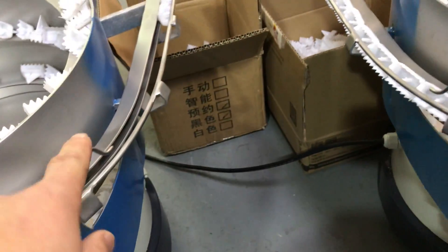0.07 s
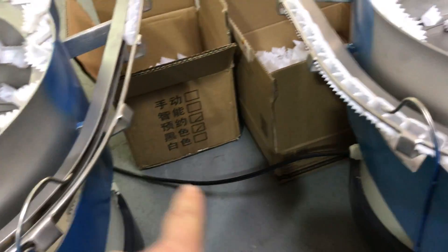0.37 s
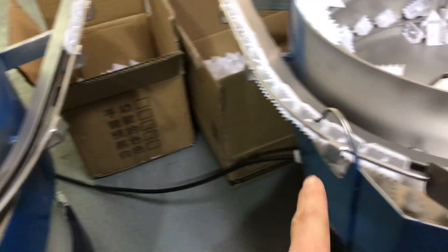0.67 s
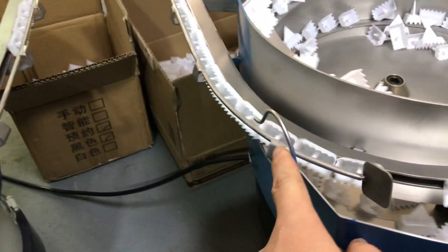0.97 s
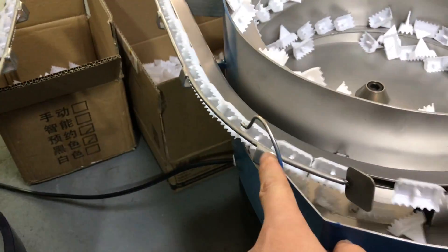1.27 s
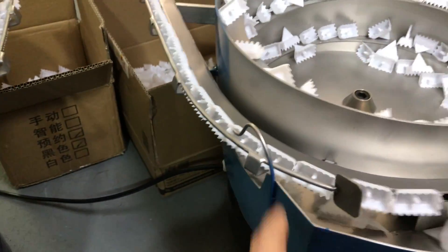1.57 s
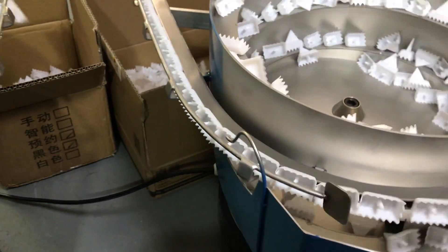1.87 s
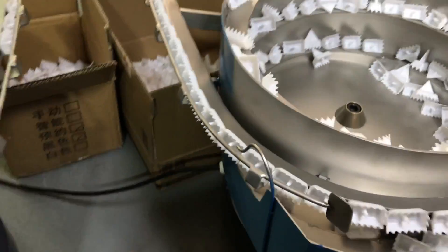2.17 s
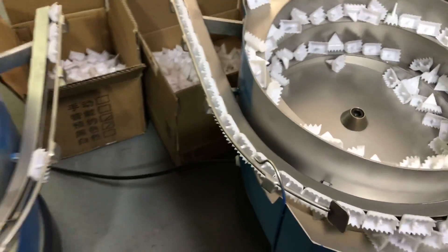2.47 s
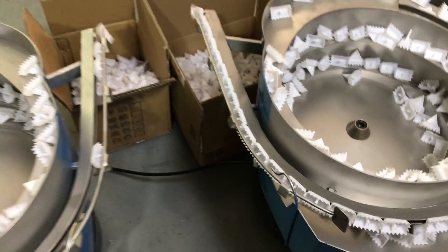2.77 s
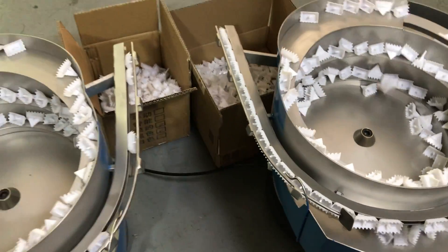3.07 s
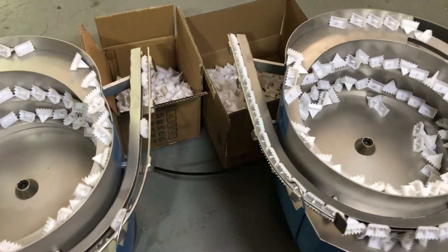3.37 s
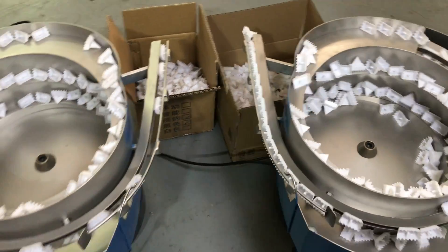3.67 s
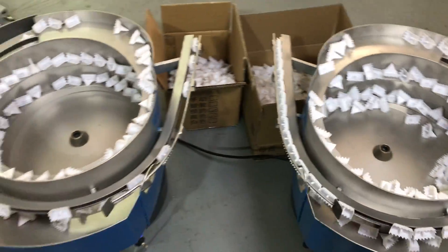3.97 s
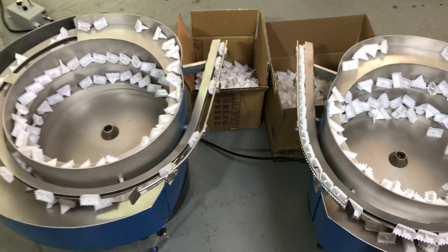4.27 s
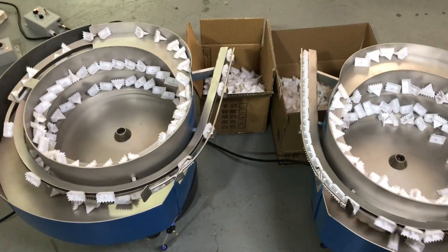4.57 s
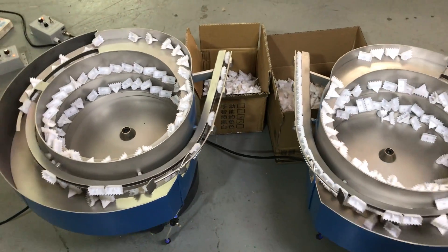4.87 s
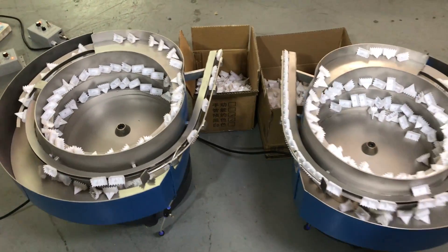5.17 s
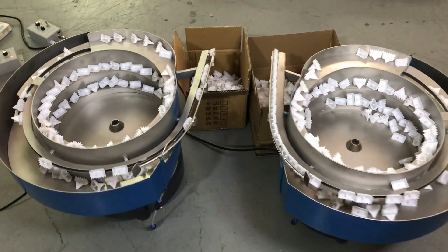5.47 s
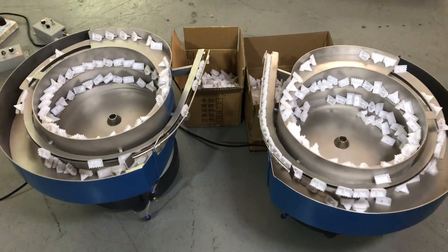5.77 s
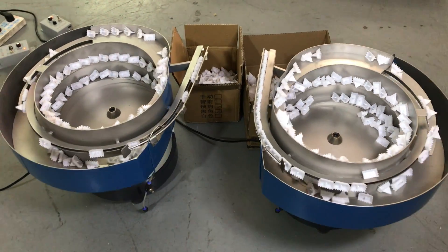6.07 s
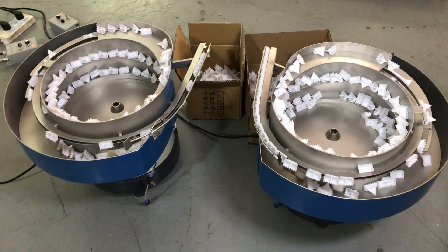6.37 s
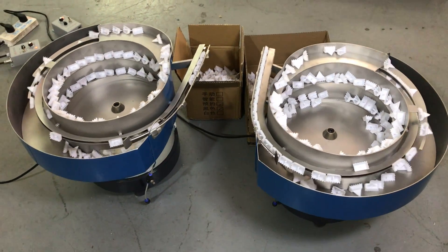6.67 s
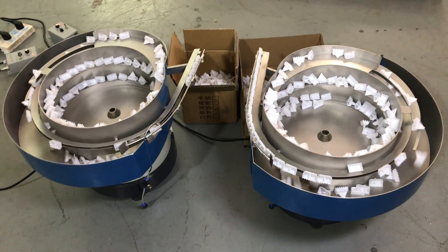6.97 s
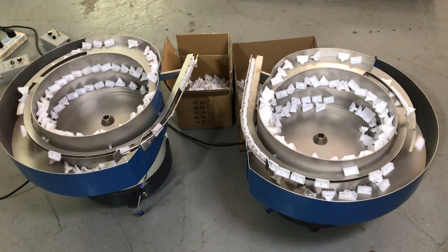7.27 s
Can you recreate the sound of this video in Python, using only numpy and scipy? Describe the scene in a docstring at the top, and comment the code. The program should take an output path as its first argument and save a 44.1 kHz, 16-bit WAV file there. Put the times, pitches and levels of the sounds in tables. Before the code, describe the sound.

Two vibratory bowl feeders are already running in a workshop and continue for the whole seven and a half seconds. Hundreds of small plastic parts hop in the steel bowls, merging into a dense, bright rattle with a flickering sizzle on top and a metallic ring inside it. Beneath it sit a steady low electric hum and a faint rumble from the shaking bases. Tiny dry plastic clicks are scattered through the clatter.

For the first two seconds or so the microphone is close to one bowl, and thin, high jingles of parts tapping steel come and go. Slightly lower ringing swells between about 1.5 and 3.3 seconds. From around 2.5 seconds the microphone draws back: the rattle gradually softens a little and the second bowl becomes more prominent. Another light ring rises at about 6.5 seconds while the hum and rattle carry on.

```python
"""Two vibratory bowl feeders in a workshop

Magnets hum at twice the mains frequency and toss hundreds of small plastic parts, which hop in
step with the drive, ring the steel bowls and shake the sprung bases. A hand-held mono microphone
passes close to the right bowl, then draws back and hears more of the left one."""
import sys
import numpy as np
from scipy import signal
from scipy.fft import rfft, irfft, next_fast_len
from scipy.io import wavfile
from scipy.ndimage import map_coordinates

SR = 44100
rng = np.random.default_rng(int(sys.argv[2]) if len(sys.argv) > 2 else 0)


def unload_wav(signal):
    """Save mono or channel-first audio to the path in sys.argv[1] as 16-bit WAV at rate SR, clipped to [-1, 1]."""
    wavfile.write(
        sys.argv[1],
        SR,
        np.round(np.clip(np.atleast_2d(signal).T, -1, 1) * 32767).astype(np.int16),
    )


N = 332073
DRIVE_HZ = 100.03

# Bowl and guide rail resonances. Each row: centre in Hz, width in Hz, dB over the broad colour.
RIGHT_BOWL_MODES = [(878, 55, 14.6), (1014, 59, 14.7), (1121, 21, 15.6), (1203, 12, 15.8), (1212, 15, 1.5),
                    (1255, 12, 22.0), (1319, 23, 20.9), (1423, 51, 18.7), (1546, 13, 16.9),
                    (1653, 50, 16.8), (1730, 15, 13.7), (1742, 14, 11.0), (1842, 14, 10.8), (1898, 23, 7.7),
                    (2238, 15, 15.0), (2312, 73, 11.9), (2523, 29, 13.9), (2658, 99, 10.0), (2829, 35, 7.4),
                    (2940, 29, 13.2), (3157, 94, 5.8), (3499, 50, 5.8), (3707, 34, 4.7), (3921, 48, 3.3),
                    (4125, 48, 5.8), (4250, 30, 4.8), (4720, 33, 3.9), (6478, 329, 3.0), (7834, 36, 7.5),
                    (8831, 50, 4.0)]
LEFT_BOWL_MODES = [(777, 37, 12.2), (858, 26, 18.8), (897, 11, 22.0), (972, 14, 17.8), (1053, 43, 20.5),
                   (1159, 12, 16.6), (1325, 26, 7.0), (1437, 40, 18.2), (1545, 13, 20.0), (1701, 82, 21.6),
                   (1838, 45, 19.5), (1935, 20, 15.6), (2008, 30, 22.0), (2174, 74, 21.9), (2323, 27, 17.9),
                   (2480, 95, 12.8), (2704, 47, 13.1), (2840, 106, 13.3), (2994, 18, 9.7),
                   (3178, 119, 12.4), (3458, 44, 10.8), (3699, 86, 11.5), (4000, 250, 8.4), (4388, 58, 6.4),
                   (4645, 23, 5.6), (5256, 89, 6.9), (5531, 70, 2.7), (5804, 85, 1.5), (6013, 52, 3.5),
                   (9932, 69, 7.4)]
GUIDE_RAIL_MODES = [(3745, 25, 3), (4370, 30, 1), (4543, 30, 1), (5250, 70, -1), (5660, 35, 1),
                    (6025, 40, 0), (6225, 40, 0), (6370, 60, 0), (6700, 70, -1), (7080, 80, 0),
                    (7515, 35, 1), (8090, 40, 2), (8195, 40, 1), (8830, 50, 0), (9400, 80, -1),
                    (10150, 70, 1)]
# Broad colour of each bowl. Each row: frequency in Hz, gain in dB.
RIGHT_BOWL_COLOUR = [(450, -62.5), (720, -21), (850, -12), (1100, -12.5), (1280, -28), (1600, -11.5),
                     (2000, -4.5), (2400, -5), (4300, 1.5), (6600, -6), (9300, -11.5), (10500, -21),
                     (13600, -17), (15700, -22.5)]
LEFT_BOWL_COLOUR = [(450, -60.5), (720, -20), (850, -23.5), (1100, -7.5), (1280, -9.5), (1600, -10.5),
                    (2000, -14.5), (2400, -6), (4300, 2), (6600, -1.5), (9300, -7), (10500, -15.5),
                    (13600, -11), (15700, -25)]
# Microphone path. Each row: time in seconds, distance in m, right bowl's share of the power.
MIC_PATH = [(0, .5, 0.4), (.6, 0.52, .89), (1.5, 0.54, 0.82), (2.3, 0.52, 0.6), (3, 0.64, 0.56),
            (3.8, 0.71, 0.34), (5, 0.85, 0.33), (6.4, 1.07, .21), (7.5, 0.91, .31)]

def rattle(ring_hz=1300, sizzle_hz=5000):
    """Hopping parts ring both bowls; balance and brightness follow the microphone."""
    right_hits = hops(count=110, wander=.12, scatter=.03, force_db=2, spell_db=2.5)
    right = resonate(right_hits, RIGHT_BOWL_COLOUR, [*RIGHT_BOWL_MODES, *GUIDE_RAIL_MODES])
    left_hits = hops(count=130, wander=.12, scatter=.03, force_db=2, spell_db=2.5)
    left = resonate(left_hits, LEFT_BOWL_COLOUR, [*LEFT_BOWL_MODES, *GUIDE_RAIL_MODES])
    distance_m, right_share = curves(MIC_PATH)
    both = workshop(np.sqrt(right_share) * unit(right) + np.sqrt(1 - right_share) * unit(left))
    ring = filtered(both, lambda hz: 1 / (1 + (hz / ring_hz) ** 16))
    sizzle = filtered(both, lambda hz: 1 - 1 / (1 + (hz / sizzle_hz) ** 16))
    clatter = unit(both - ring - sizzle)
    sizzle = unit(sizzle * amp(.45 * wobble(26)))  # jostling parts flicker the sharpest contacts
    ring_db = -11 + 2 * np.clip((right_share - .72) / .13, 0, 1)  # rises over the right bowl
    sizzle_db = -5.5 - .44 * np.log2(distance_m)
    return amp(clatter_db()) * (clatter + amp(ring_db) * unit(ring) + amp(sizzle_db) * sizzle)


def clatter_db(direct_1m_db=-26.5, room_radius_m=.78):
    """Midrange rattle level: direct sound falls with distance, the room's share stays."""
    distance_m, _ = curves(MIC_PATH)
    return direct_1m_db + 10 * np.log10(1 / distance_m ** 2 + 1 / room_radius_m ** 2)


def hops(count, wander, scatter, force_db, spell_db):
    """Parts land every 1, 2 or 3 strokes. Timing spreads are in strokes, force spreads in dB."""
    stroke = np.arange(int(N / SR * DRIVE_HZ) + 1)
    part = np.arange(count)[:, None]
    shape = (count, len(stroke))

    def drift():
        """Slow random change per part."""
        noise = rng.standard_normal(shape)
        return unit(signal.fftconvolve(noise, np.hanning(40)[None], "same", axes=1))

    lands = (stroke + rng.integers(0, 6, (count, 1))) % (1 + part % 3) == 0
    # each part's moment in the stroke drifts as it creeps up the track
    moment = part / count + wander * drift() + scatter * rng.standard_normal(shape)
    force = amp(spell_db * drift() + force_db * rng.standard_normal(shape))
    force *= rng.choice([-1, 1], (count, 1))
    at = np.round((stroke + moment) / DRIVE_HZ * SR).astype(int) % N
    return unit(np.bincount(at[lands], force[lands], N))


# Drive tone at the microphone. Each row: time in seconds, rms level in dB.
DRIVE_LEVELS = [(0.15, -27.5), (0.7, -27), (1.95, -27.5), (2.69, -26), (6.19, -28.5), (7.4, -29)]
# Overtones. Each row: multiple, dB re the mean drive level, waver in dB, dB per dB of drive rise.
DRIVE_OVERTONES = [(2, -18, 1.3, 1.8), (3, -19, 0.8, -0.2), (5, -48, .7, 1), (6, -42, .7, 1),
                   (9, -24, 4, 3)]

def magnets():
    """The magnets hum; overtones follow the drive level and waver with the load."""
    drive_db, = curves(DRIVE_LEVELS)
    rise_db = drive_db - drive_db.mean()
    overtones = sum(amp(db + follow * rise_db + waver_db * wobble(4.8)) * tone(multiple)
                    for multiple, db, waver_db, follow in DRIVE_OVERTONES)
    return amp(drive_db) * tone(1) + amp(drive_db.mean()) * overtones


# Chatter on one spot. Each row: start in seconds, length in seconds, pitch in Hz, crest in dB rms.
JINGLE_SPELLS = [(0, 0.16, 7860, -33), (0, 0.49, 5260, -32), (.58, .16, 7100, -33), (.8, 0.96, 7860, -34),
                 (.55, 1.1, 6370, -36), (1.1, .6, 6680, -34), (1.6, 1.1, 1666, -33),
                 (1.8, 1.5, 4130, -31.5), (2.6, 0.58, 2510, -31.5), (2.97, .06, 5243, -28),
                 (3, .8, 6600, -39), (3.2, .8, 6330, -40), (6.4, 1.4, 3240, -35)]

def jingles(width_hz=32, stray_count=10, stray_s=1.3):
    """A few parts tap one steel resonance per spell; faint stray spells ring the rails."""
    taps = hops(count=12, wander=.15, scatter=.032, force_db=5, spell_db=2)
    sound, level_db = np.zeros(N), clatter_db()
    strays = []
    for when, which in rng.random((stray_count, 2)):
        hz = GUIDE_RAIL_MODES[int(which * len(GUIDE_RAIL_MODES))][0]
        db = level_db[int(when * N)] - 19 + along(LEFT_BOWL_COLOUR, hz)
        strays.append((when * (N - SR // 4) / SR, stray_s, hz, db))
    for start_s, length_s, hz, db in [*JINGLE_SPELLS, *strays]:
        at = np.arange(int(start_s * SR), min(int((start_s + length_s) * SR), N))
        swell = np.abs(np.sin(np.pi * (at / SR - start_s) / length_s)) ** .5
        ring = signal.lfilter(*signal.iirpeak(hz, hz / width_hz, SR), taps[at])
        sound[at] += amp(db) * swell * unit(ring)
    return sound


# Sprung bases and sheet-metal skirts. Each row: centre in Hz, width in Hz, dB over the broad colour.
SPRUNG_BASE_MODES = [(35, 6, 3), (51, 5, 6), (66, 2.5, 17.5), (217.5, 3.6, 11), (255, 6.2, 15.5),
                     (315, 2.2, 22.5), (350, 3.5, 17), (374, 8.6, 15.5), (400, 3.6, 17.5), (430, 4.5, 18.5),
                     (462.6, 6.7, 18.5), (511.5, 6.2, 18.5), (536, 13, 18.5), (547.6, 10, 19),
                     (582, 6.3, 20.5), (594, 5.5, 5), (640, 6.3, 25.5), (707, 6, 18), (738.6, 12, 18),
                     (780.5, 7.2, 18.5)]
# Their broad colour. Each row: frequency in Hz, gain in dB.
SPRUNG_BASE_COLOUR = [(10, -42), (27, -13), (35, -3), (120, 2), (280, -1.5), (430, -13), (560, -10),
                      (790, -2), (1000, -24), (2000, -68)]

def bases():
    """The shifting load of parts shakes the low resonances of the bases."""
    load = hops(count=60, wander=.4, scatter=.3, force_db=2, spell_db=1.5)
    _, right_share = curves(MIC_PATH)
    rumble = unit(resonate(load, SPRUNG_BASE_COLOUR, SPRUNG_BASE_MODES))
    return amp(-42.5 + 3.1 * right_share) * rumble


# Plastic striking plastic. Each row: frequency in Hz, gain in dB.
PLASTIC_COLOUR = [(2000, -22), (6000, -2), (9000, 2), (10500, -2.5), (13600, -8), (15700, -3)]

def ticks():
    """A few loose parts click against each other, high and dry."""
    knocks = hops(count=10, wander=.15, scatter=.061, force_db=5, spell_db=5)
    knocks *= amp(2.8 * wobble(28))
    return amp(clatter_db() - 23) * unit(resonate(knocks, PLASTIC_COLOUR, []))


def touched_track(start_s=.58, attack_s=.2, hold_s=.38, release_s=.42, crest_db=-50.5):
    """While a finger rests on the track, a faint drone at one and a half times the drive swells once."""
    corners_s = start_s + np.cumsum([0, attack_s, hold_s, release_s])
    swell = np.interp(np.arange(N) / SR, corners_s, [0, 1, 1, 0])
    drive_db, = curves(DRIVE_LEVELS)
    return np.maximum(amp(crest_db) * swell, amp(drive_db - 39)) * tone(1.5)


# Room decay. Each row: frequency in Hz, T60 in seconds.
WORKSHOP_T60 = [(200, 0.73), (2000, 0.43), (6000, 0.28), (14000, 0.22)]

def workshop(x, wet_db=-4, places=18):
    """Direct sound plus a diffuse tail, crossfaded between places on the microphone's path."""
    hz, t, noise = signal.stft(rng.standard_normal((places, SR // 4)), SR, nperseg=256)
    decay = amp(-60 * t / along(WORKSHOP_T60, hz)[:, None])
    _, tails = signal.istft(noise * decay, SR, nperseg=256)
    size, step = tails.shape[1], N // (places - 1) + 1
    padded = np.pad(x, (step + size - 1, 2 * step), mode="wrap")
    wet = np.zeros((places + 1) * step)
    for place, tail in enumerate(tails):
        segment = padded[place * step:][:2 * step + size - 1]
        reverb = signal.fftconvolve(segment, tail / np.linalg.norm(tail), "valid")
        wet[place * step:][:2 * step] += signal.windows.cosine(2 * step) * reverb
    return x + amp(wet_db) * wet[step:step + N]


def resonate(hits, colour, modes, size=32768):
    """Hits ring a body whose resonances stand on a broad colour."""
    hz = np.fft.rfftfreq(size, 1 / SR)
    peaks = 1 + sum(amp(db) ** 2 / (1 + (2 * (hz - centre) / width) ** 2) for centre, width, db in modes)
    cepstrum = irfft(np.log(amp(along(colour, hz)) * np.sqrt(peaks) + 1e-6))
    cepstrum[1:size // 2] *= 2  # fold to minimum phase
    cepstrum[size // 2 + 1:] = 0
    impulse = irfft(np.exp(rfft(cepstrum)))[:size // 2]
    wrapped = np.r_[hits[N - len(impulse) + 1:], hits]  # already ringing at the start
    return signal.fftconvolve(wrapped, impulse, "valid")


def tone(multiple):
    """A sine of rms 1 at a multiple of the drive."""
    return np.sqrt(2) * np.sin(2 * np.pi * (multiple * DRIVE_HZ * np.arange(N) / SR + rng.random()))


def amp(db):
    """Decibels to gain."""
    return 10 ** (np.asarray(db) / 20)


def unit(x):
    """Scale to rms 1."""
    return x / np.sqrt(np.mean(x ** 2) + 1e-20)


def along(points, hz):
    """Read (Hz, value) points on a log axis."""
    knots_hz, values = np.transpose(points)
    return np.interp(np.log(hz + 1), np.log(knots_hz + 1), values)


def curves(rows):
    """One value per sample for each column after the time."""
    times_s, *columns = np.transpose(rows)
    return [np.interp(np.arange(N) / SR, times_s, column) for column in columns]


def wobble(knots_per_s):
    """A smooth random curve."""
    return map_coordinates(rng.standard_normal(256), [np.arange(N) * knots_per_s / SR], mode="mirror")


def filtered(x, response):
    """Apply a gain given as a function of Hz."""
    size = next_fast_len(N + SR // 4)
    return irfft(rfft(x, size) * response(np.fft.rfftfreq(size, 1 / SR)), size)[:N]


def scene():
    """Both machines, the same in each ear."""
    return np.tile(rattle() + jingles() + ticks() + bases() + magnets() + touched_track(), (2, 1))


def record(dry):
    """Cut the top of the treble."""
    top_hz = 15720
    return np.array([filtered(channel, lambda hz: hz < top_hz) for channel in dry])


dry = scene()
out = record(dry)
unload_wav(out)
```